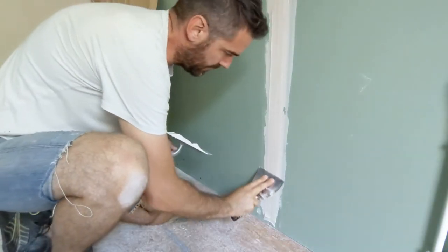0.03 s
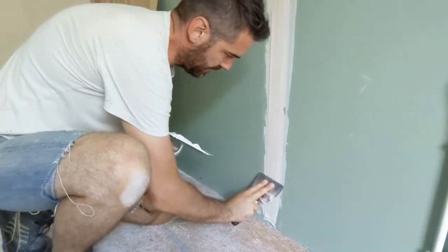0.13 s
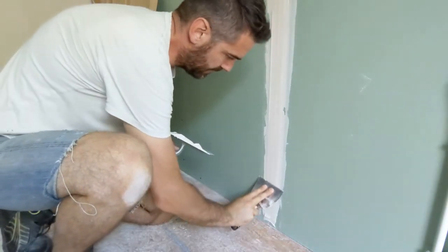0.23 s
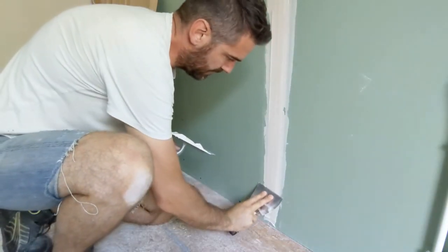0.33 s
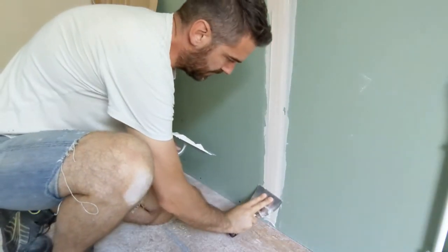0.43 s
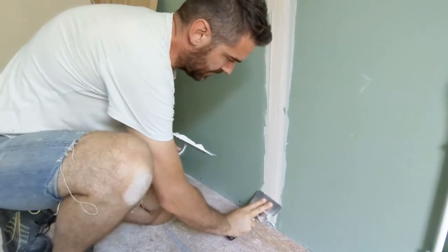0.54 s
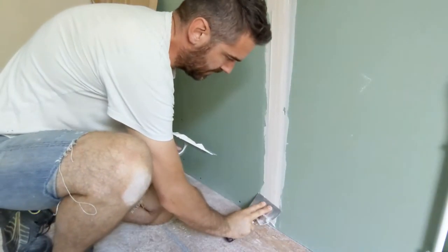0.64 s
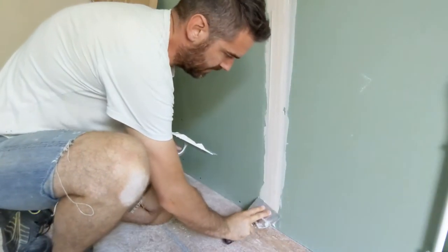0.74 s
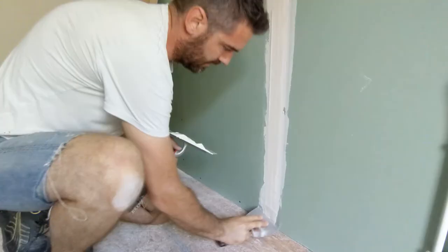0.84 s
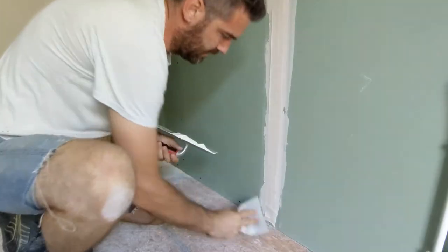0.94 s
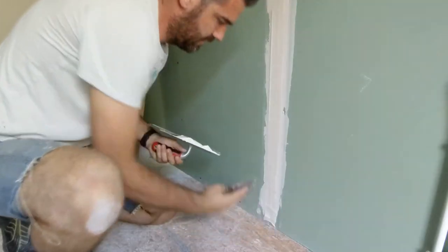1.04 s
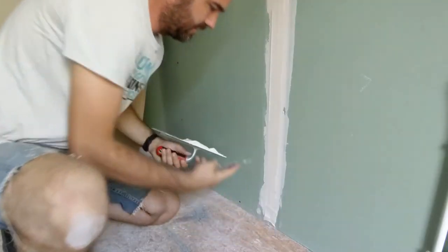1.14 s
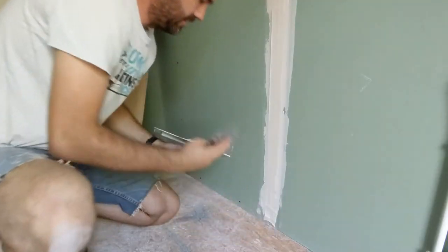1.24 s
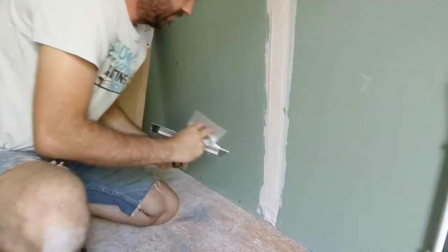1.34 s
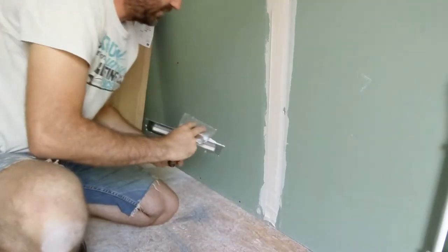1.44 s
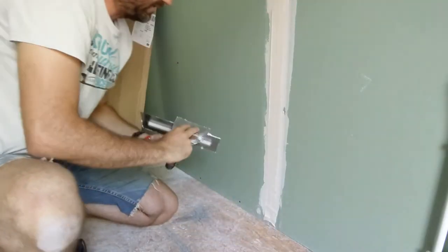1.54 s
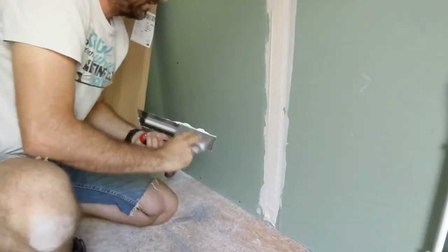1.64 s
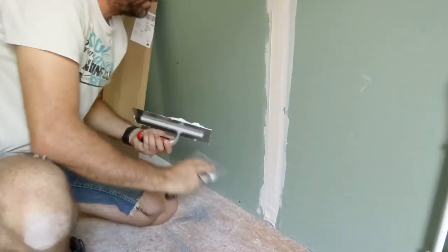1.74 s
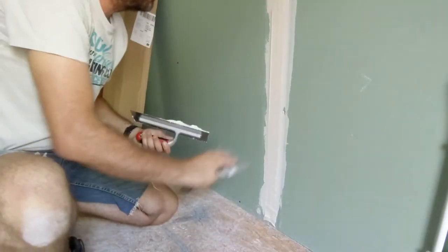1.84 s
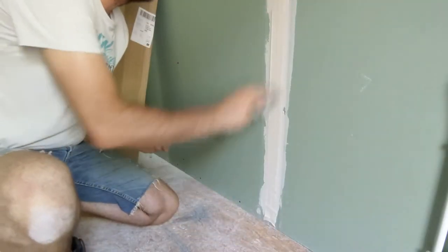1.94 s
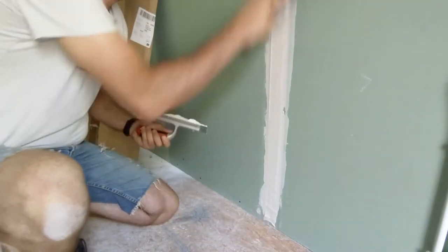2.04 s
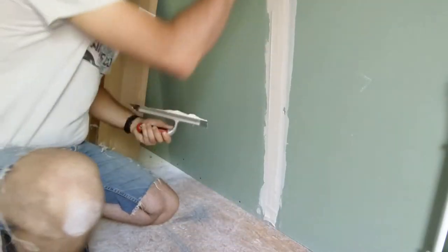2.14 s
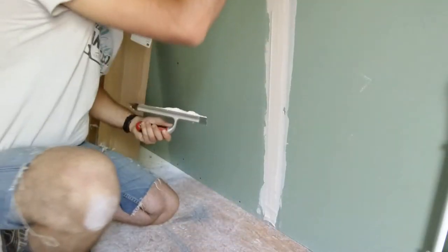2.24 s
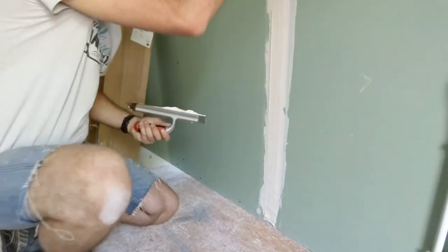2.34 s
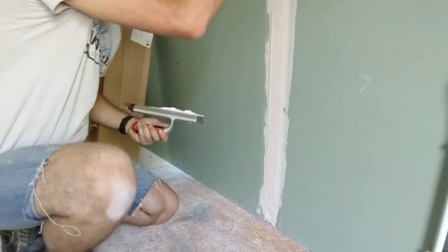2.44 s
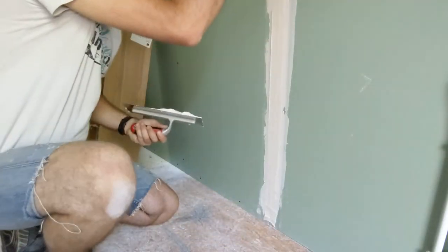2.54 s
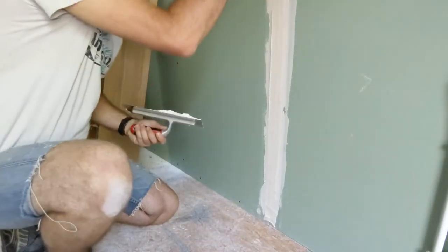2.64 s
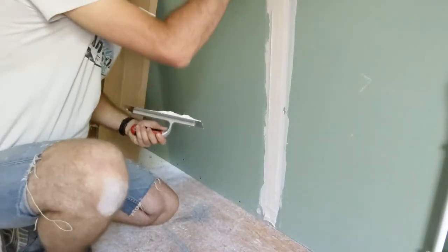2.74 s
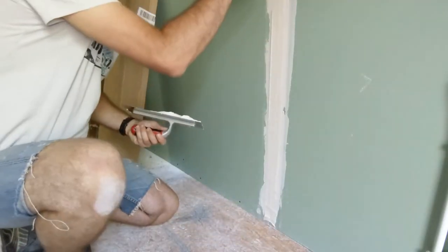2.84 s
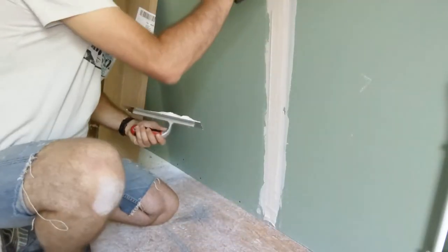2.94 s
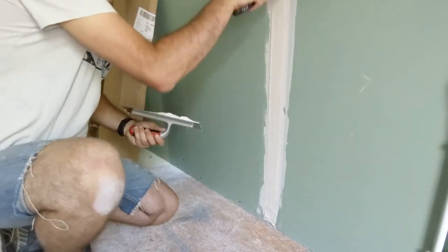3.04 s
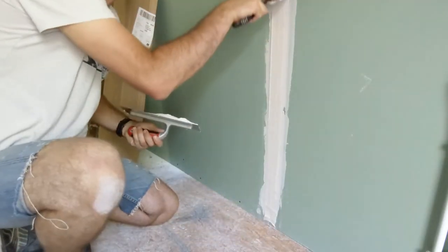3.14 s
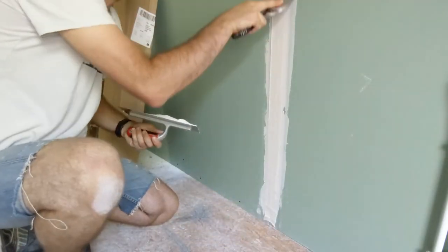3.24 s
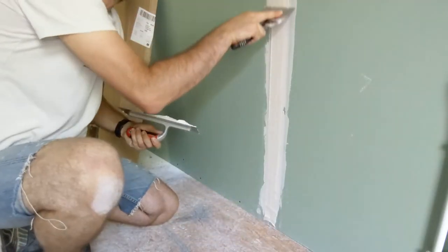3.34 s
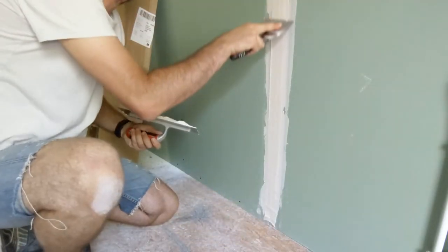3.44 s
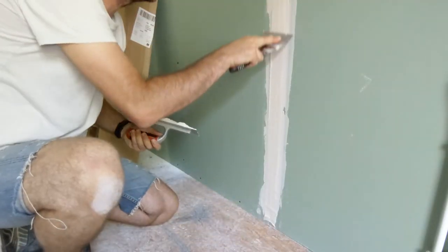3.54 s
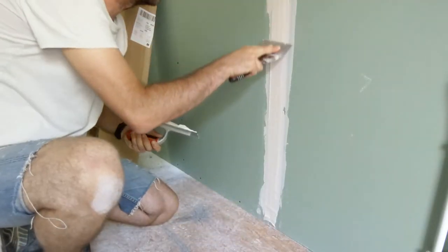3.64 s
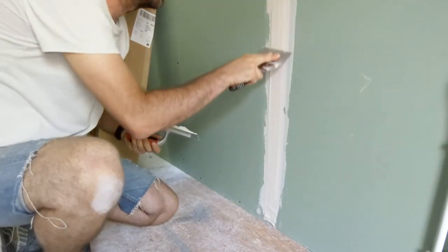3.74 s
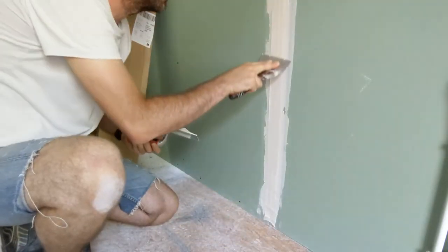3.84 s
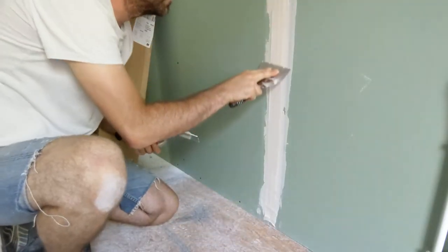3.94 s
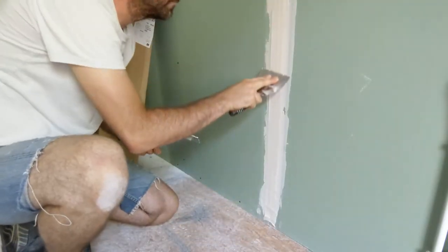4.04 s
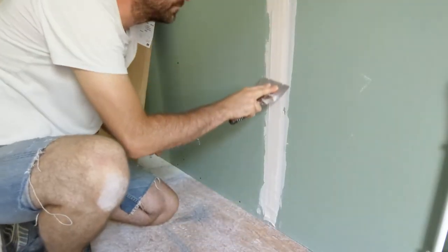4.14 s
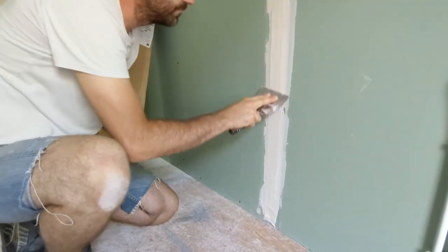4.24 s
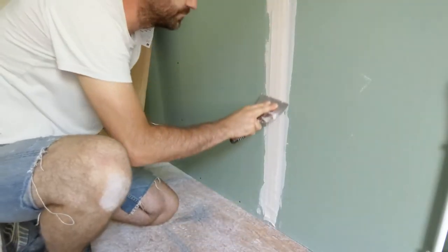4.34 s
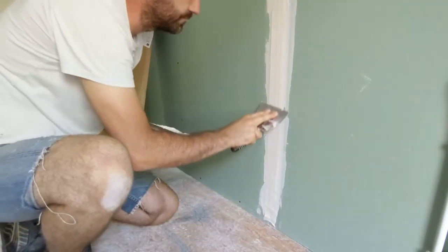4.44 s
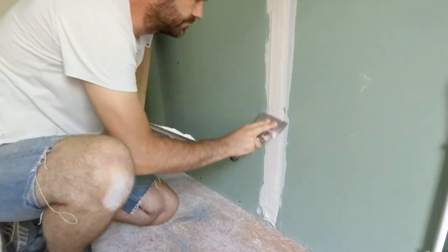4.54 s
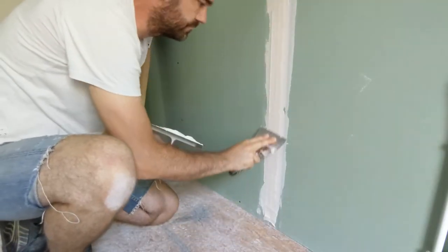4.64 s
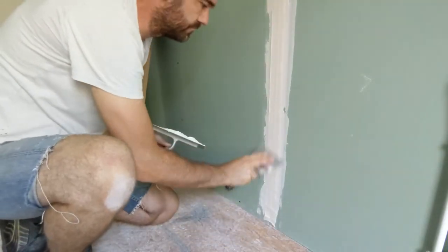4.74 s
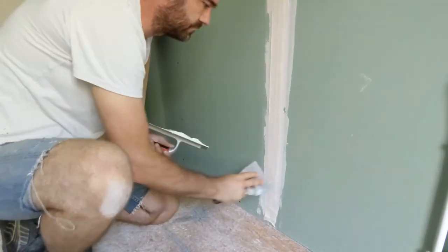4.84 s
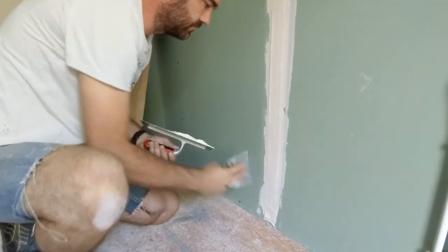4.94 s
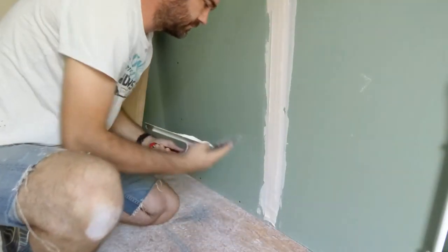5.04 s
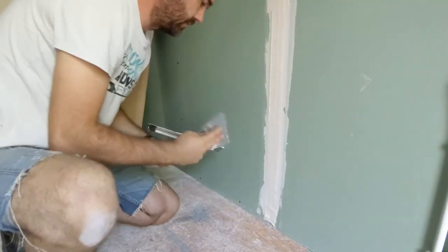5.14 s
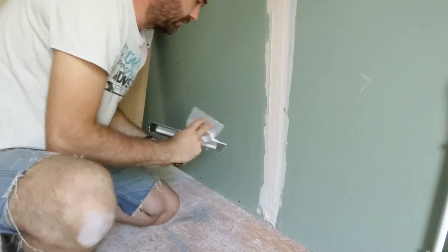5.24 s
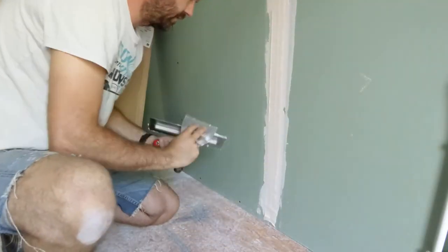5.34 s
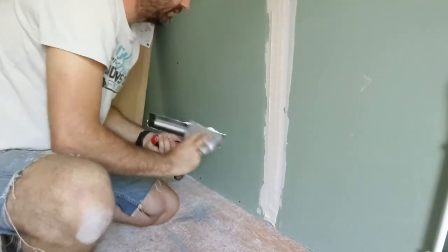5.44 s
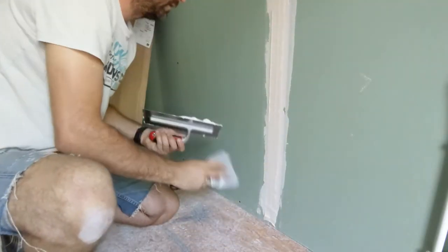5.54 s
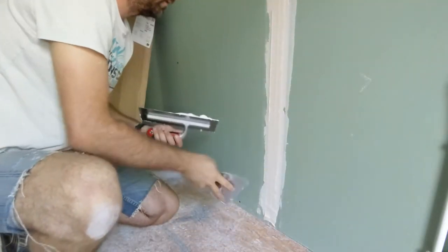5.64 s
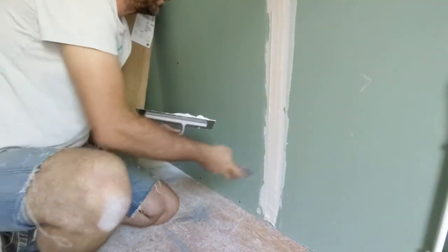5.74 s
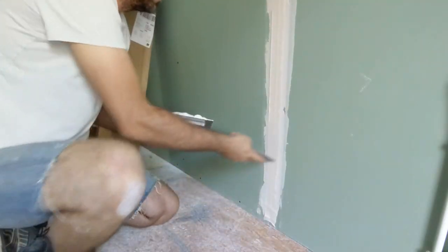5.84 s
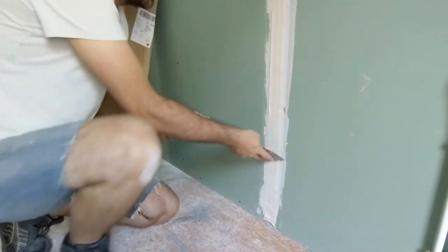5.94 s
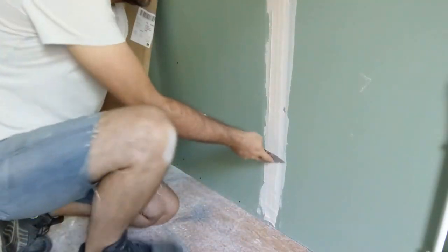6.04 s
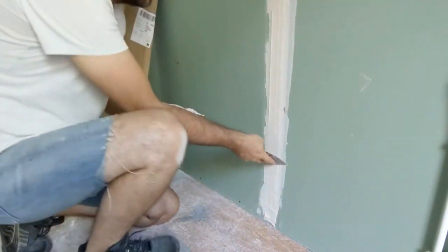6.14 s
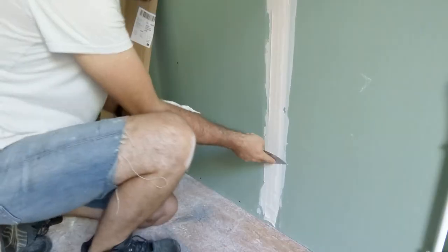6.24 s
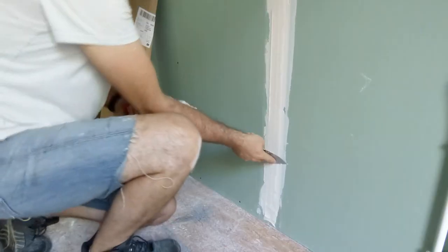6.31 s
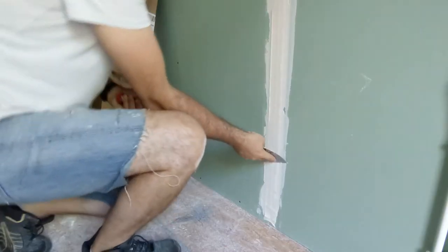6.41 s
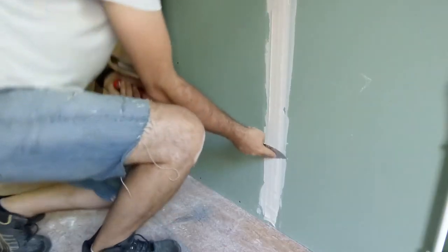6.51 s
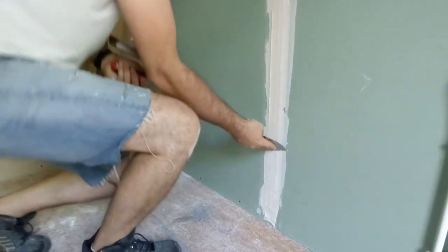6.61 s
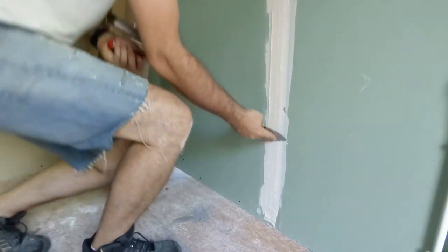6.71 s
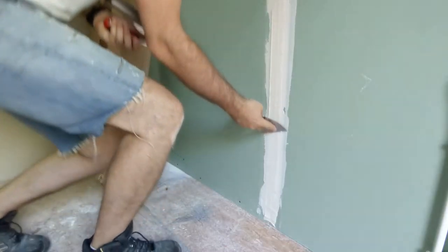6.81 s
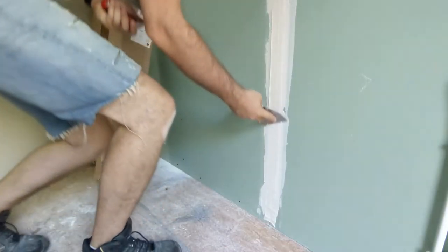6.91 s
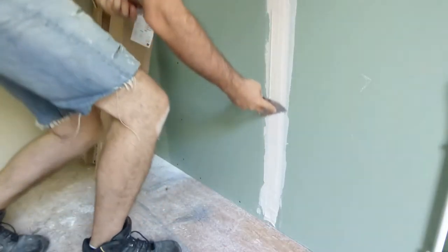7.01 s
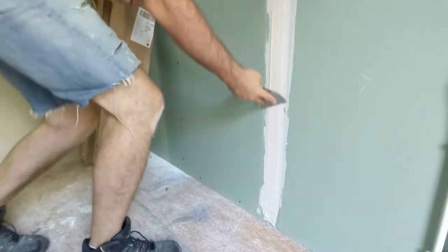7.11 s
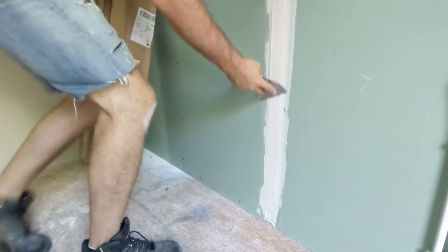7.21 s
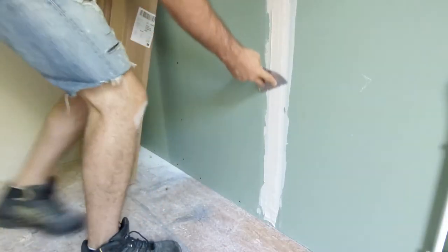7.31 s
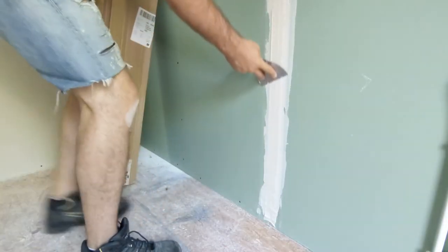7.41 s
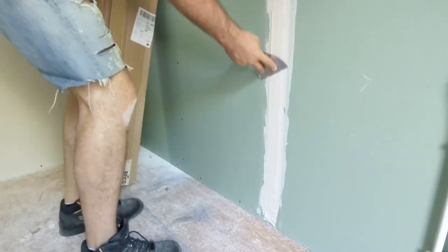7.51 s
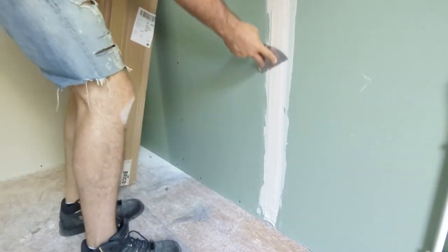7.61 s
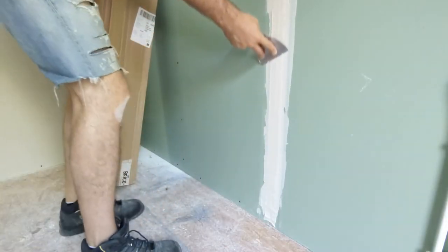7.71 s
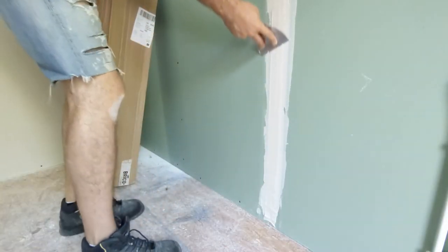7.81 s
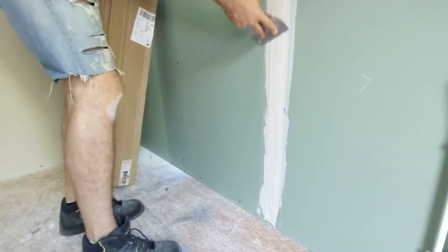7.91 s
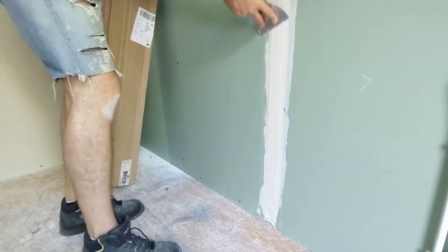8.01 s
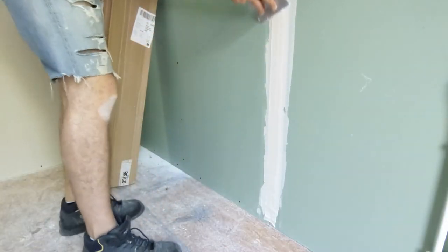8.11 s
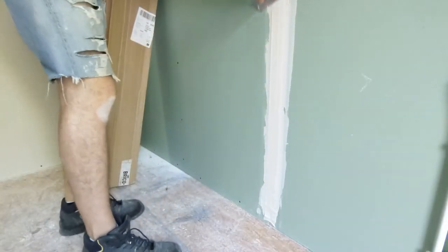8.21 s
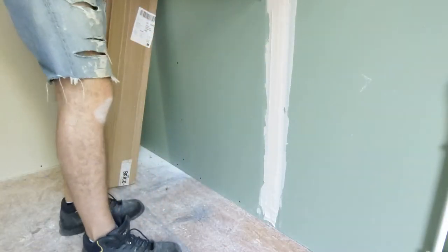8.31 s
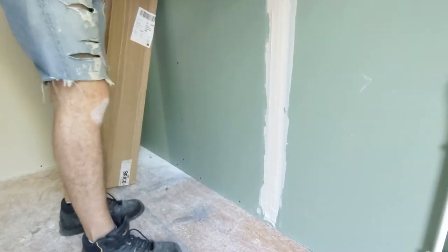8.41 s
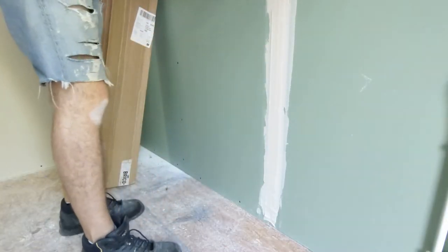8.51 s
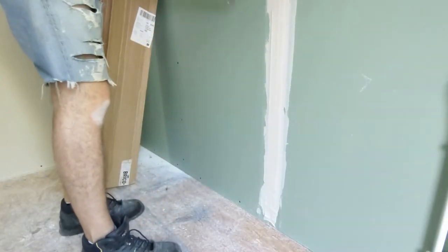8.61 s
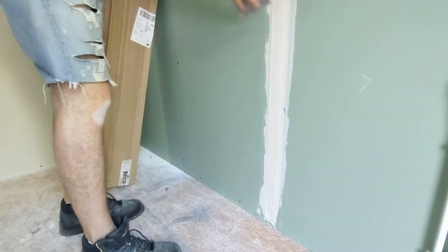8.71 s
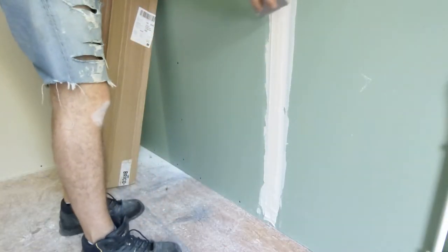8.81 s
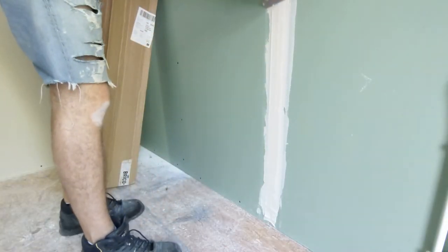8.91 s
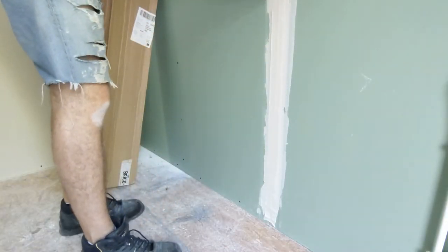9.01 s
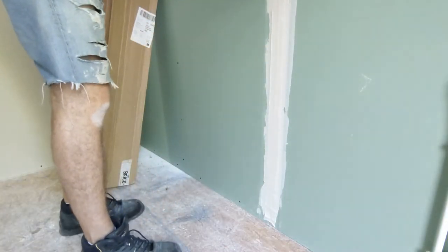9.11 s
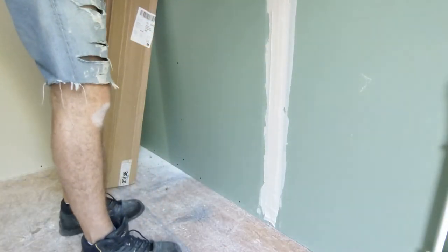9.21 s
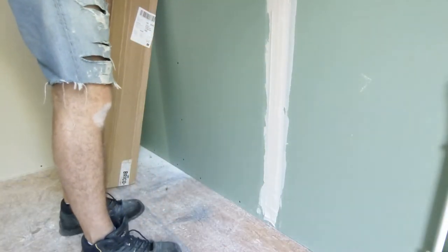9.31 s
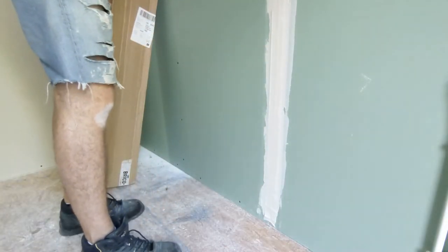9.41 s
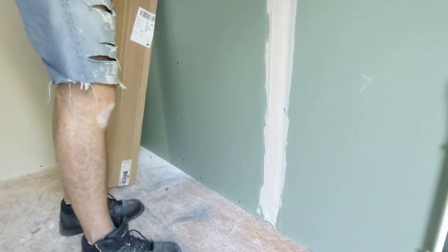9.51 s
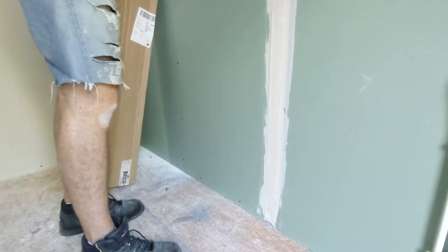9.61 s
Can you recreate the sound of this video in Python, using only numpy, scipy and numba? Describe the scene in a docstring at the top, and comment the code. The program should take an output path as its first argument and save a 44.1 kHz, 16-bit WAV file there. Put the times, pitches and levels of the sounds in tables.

```python
"""In a bare room, a flexible steel spatula makes three quick dabs on a plasterboard joint and springs free
with a hissing flick. Clothes rustle, the blade taps the board, then is wiped and knocked on a steel trowel.
A long gritty stroke ends in another flick, and the blade meets the trowel again. During the second long
stroke the worker gets up from the floor with two heavy steps and sliding shoes. A third flick and one last
stroke follow. The scraping is grit slipping under the edge: it hisses, rings the blade and drums the board."""
import sys
import numpy as np
from scipy import signal
from scipy.fft import rfft, irfft, next_fast_len
from scipy.io import wavfile
from scipy.ndimage import map_coordinates
from numba import njit

SR = 44100
rng = np.random.default_rng(int(sys.argv[2]) if len(sys.argv) > 2 else 0)


def persist_wave(psi):
    """Save psi, clipped to +-1, as 16-bit WAV."""
    counts = np.round(np.clip(psi, -1, 1) * 32767).astype(np.int16)
    wavfile.write(sys.argv[1], SR, np.atleast_2d(counts).T)


N = 426006
TIME = np.arange(N) / SR


def amp(db):
    """Turn decibels (dB) into a number to multiply by."""
    return 10 ** (np.asarray(db) / 20)


def unit(x):
    """Scale a sound to an average (rms) level of 1."""
    return x / np.sqrt(np.mean(x ** 2) + 1e-20)


def unit_hit(x):
    """Give a hit the energy of 20 ms of sound at level 1."""
    return x * np.sqrt(SR / 50 / (np.sum(x ** 2) + 1e-20))


def at_pitch(points, hz):
    """Read between (Hz, value) points on a musical (log) scale."""
    pitches, values = np.transpose(points)
    return np.interp(np.log(hz + 1), np.log(pitches + 1), values)


def curves(rows):
    """Join timed rows with straight lines: one curve for each column after the time."""
    times, *columns = np.transpose(rows)
    return [np.interp(TIME, times, column) for column in columns]


def wobble(rate):
    """A smooth curve through `rate` random values a second."""
    return map_coordinates(rng.standard_normal(int(N * rate / SR) + 4), [TIME * rate])


def add(track, start_s, x):
    """Mix x into the track from start_s on."""
    start = max(0, round(start_s * SR))
    part = x[..., :N - start]
    track[..., start:start + part.shape[-1]] += part


def colour(x, tone):
    """Filter a sound to a tone, given as (Hz, dB) points."""
    n = x.shape[-1]
    size = 2 * next_fast_len(n // 2 + 4096)
    gain = amp(at_pitch(tone, np.fft.rfftfreq(size, 1 / SR)))
    cepstrum = irfft(np.log(gain))
    cepstrum[1:size // 2] *= 2  # folded forward so nothing sounds before its cause
    cepstrum[size // 2 + 1:] = 0
    return irfft(rfft(x, size) * np.exp(rfft(cepstrum)), size)[..., :n]


@njit
def resonate(x, hz, width_hz):
    """Make a sound ring at a pitch that can move."""
    y = np.zeros(len(x))
    r = np.exp(-np.pi * width_hz / SR)
    for i in range(2, len(x)):
        y[i] = x[i] - x[i - 2] + 2 * r * np.cos(2 * np.pi * hz[i] / SR) * y[i - 1] - r * r * y[i - 2]
    return y


def grit(n, rate, spread_db):
    """Tiny slips of random size, about `rate` of them a second."""
    slips = (rng.random(n) < rate / SR) * rng.standard_normal(n)
    sizes = amp(spread_db * np.minimum(rng.standard_normal(n), 2))
    return unit(slips * sizes)


def contact(tone, t60):
    """A chattering touch: a noise burst whose fade time, t60, is the seconds it takes to drop 60 dB."""
    t = np.arange(SR // 2) / SR
    return unit_hit(colour(rng.standard_normal(len(t)) * amp(-60 * t / t60), tone))


def click(tone):
    """One clean, hard touch."""
    return unit_hit(colour(signal.unit_impulse(SR // 2), tone))


def ring(notes):
    """A struck object's fading notes, alternating in sign and a little different in strength each time."""
    t = np.arange(SR // 2) / SR
    out = np.zeros(len(t))
    for k, (hz, db, t60) in enumerate(notes):
        fade = amp(db + rng.standard_normal() - 60 * t / t60)
        out += (-1) ** k * fade * np.sin(2 * np.pi * hz * t)
    return unit_hit(out)


# How long the room echoes. Each row: pitch in Hz, fade time in seconds.
ECHO_FADE = [(60, 0.2), (200, 0.52), (500, 0.84), (1200, 0.6), (4000, 0.51), (9000, 0.39), (15000, 0.22)]
# How alike the left and right echoes are. Each row: pitch in Hz, likeness from 0 to 1.
ECHO_LIKENESS = [(100, 0.78), (250, 0.94), (500, 0.058), (1000, 0.53), (2000, 0)]

def room(x, echo_db, left_lead_ms=0):
    """The direct sound plus a fresh stereo echo from the bare walls, at the same overall power."""
    hz, t, (shared, apart) = signal.stft(rng.standard_normal((2, SR * 3 // 5)), SR, nperseg=256)
    angle = np.arccos(np.clip(at_pitch(ECHO_LIKENESS, hz), -1, 1))[:, None] / 2
    middle, side = np.cos(angle) * shared, np.sin(angle) * apart
    fade = amp(-60 * t / at_pitch(ECHO_FADE, hz)[:, None])
    tail = signal.istft(np.array([middle + side, middle - side]) * fade, SR, nperseg=256)[1]
    tail = np.pad(tail, ((0, 0), (SR // 300, 0)))  # the echo comes about 3 ms late
    response = amp(echo_db) * tail / np.linalg.norm(tail[0])
    lead = round(left_lead_ms * SR / 1000)
    response[0, max(0, -lead)] = response[1, max(0, lead)] = 1  # the nearer side hears it first
    return signal.fftconvolve(x[None], response, axes=1) / np.hypot(1, amp(echo_db))


def moving_in_room(x, echo_db):
    """A travelling sound keeps meeting new echoes."""
    out, size = np.zeros((2, N)), SR // 14
    for start in range(0, N, size):
        add(out, start / SR, room(x[start:start + size], echo_db, left_lead_ms=-0.025))
    return out


def rubs(rows, tone, lateness):
    """Short swelling rubs made of fine slips; more lateness moves the peak toward the end."""
    out = np.zeros((2, N))
    for start, length, db in rows:
        swell = np.sin(np.pi * np.linspace(0, 1, int(length * SR)) ** lateness) ** 2
        slips = unit(colour(grit(SR // 2, rate=4000, spread_db=4), tone))
        add(out, start, room(amp(db) * swell * slips[:len(swell)], echo_db=4.5))
    return out


# The tone of the room's air. Each row: pitch in Hz, relative level in dB.
AIR_TONE = [(30, -27), (60, -6.5), (150, -12), (300, -11.5), (1000, -16.5), (2500, -25.5), (7000, -30.5),
            (15500, -37)]

def air_and_floor():
    """Quiet air, and a deep tremble of the floor that grows once the worker starts shifting his weight."""
    tremble_tone = [(4, -7.5), (14, -8), (22, -3), (35, -25.5), (70, -33), (300, -92)]
    tremble = unit(colour(rng.standard_normal(N), tremble_tone))
    tremble_db = np.interp(TIME, [1.9, 2.01], [-63.5, -55])  # from still to restless
    air = unit(colour(rng.standard_normal((2, N)) + rng.standard_normal(N), AIR_TONE))
    return amp(tremble_db) * tremble + amp(-70.5) * air


# The dabs and strokes. Each row: touch time, lift time and time taken to bite, all in seconds.
STROKES = [(-.02, 0.092, .005), (0.103, 0.508, .03), (0.526, 0.922, .037), (2.513, 4.915, 0.076),
           (5.916, 8.579, 0.11), (9.013, 9.704, 0.21)]

def edge_grip():
    """Each stroke bites, holds and lifts: 0 is off the wall, 1 is full contact."""
    release_s = 0.009
    return sum(np.clip(np.minimum((TIME - touch) / bite, 1 + (lift - TIME) / release_s), 0, 1)
               for touch, lift, bite in STROKES)


def blade_note(hz, width_hz):
    """Fine, even grit keeps one of the blade's notes ringing."""
    return unit(resonate(grit(N, rate=8000, spread_db=0.5), hz, width_hz))


# How hard the hand presses. Each row: time in seconds, pressure as a relative level in dB, rasp boost in dB.
HAND_PRESSURE = np.concatenate([[(0.0, -44.5, -6), (0.046, -48.5, 0.5), (0.172, -65, 4), (0.384, -60, 1),
                 (0.404, -56.5, 8.5), (0.488, -63, 5), (0.542, -65, -2), (0.63, -58.5, 4),
                 (0.716, -62.5, 1.5), (0.86, -53, 1.5)], [(2.6, -60.5, 7.5), (2.86, -53, -2.5),
                 (3.01, -58.5, 7.5), (3.05, -54, -1), (3.15, -53, 5), (3.33, -58.5, 4), (3.63, -52, 2),
                 (3.87, -58.5, 5), (4.19, -58, 1), (4.32, -55, 3.5), (4.52, -59, 3), (4.78, -50.5, 2.5)],
                 [(6.02, -66, 7), (6.09, -57, 3.5)], [(6.33, -73.5, 17), (6.598, -63.5, 5),
                 (6.768, -54.5, -0.5), (6.9, -56, 1), (7.366, -57.5, -1.5), (7.55, -62, -3)],
                 [(7.85, -59.5, 3), (7.942, -56, 4), (8.044, -58.5, 5), (8.13, -55.5, 5.5), (8.48, -55, 4)],
                 [(9.06, -54, 18), (9.098, -49, -15), (9.16, -52, -4), (9.36, -55.5, -1), (9.62, -56, 0)]])
# The wrist bends the blade and so tunes it. Each row: time in seconds, low note in Hz,
# its level in dB against the rasp, high note in Hz, its level in dB against the hiss.
BLADE_NOTES = [(.06, 1760, 4, 4020, -8), (.14, 1700, -10, 4500, -7), (.45, 1020, -11, 4840, -9),
               (.76, 1000, -2, 4600, -12), (.88, 940, 4.5, 3800, -16), (2.58, 1450, 1, 3500, -18),
               (2.77, 1150, -8, 3850, -16), (2.89, 1020, -8, 4000, -7), (3.25, 1040, -5, 4130, -8),
               (3.5, 1450, -3, 4280, -8), (3.95, 1550, -6, 4580, -11), (4.58, 1516, 4, 4480, -7.5),
               (4.76, 1900, -2, 4220, -7.5), (4.83, 1950, -4, 4150, -4), (4.87, 1330, 0.5, 3500, -9),
               (4.92, 1240, 2.5, 3400, -17), (6.5, 1330, -2, 4150, -10), (6.88, 1310, 3.5, 4000, -9),
               (7.25, 1540, 1.5, 3950, -11), (7.5, 1360, -6, 3900, -5), (7.9, 1310, -8, 4050, -13),
               (8.12, 1500, 9.5, 3960, -12), (8.3, 1130, 0.5, 3930, -11), (8.4, 1100, 4.5, 3930, -12),
               (8.45, 1260, 6.5, 3850, -16), (8.55, 1270, -0.5, 3700, -11), (9.07, 1460, -10, 2500, -20),
               (9.16, 1540, 15, 3320, 3), (9.27, 1520, 0, 4160, -13), (9.43, 1437, 5.5, 3850, -2),
               (9.63, 1490, 0, 4100, -9.5)]
# The tones of the edge's hiss, blade's rasp and board's drone. Each row: pitch in Hz, relative level in dB.
HISS_TONE = [(150, -16), (500, -14), (1300, 3), (1900, -0.5), (2400, 0.5), (3500, 0.5), (4200, -1.5),
             (4900, -9.5), (5700, 0.5), (6500, -11), (7600, -4.5), (8500, -13), (9600, -5.5), (10700, -14),
             (11700, -9), (15500, -11.5)]
RASP_TONE = [(350, -32.5), (650, 5), (1000, 7), (1600, -2.5), (2100, -1.5), (3500, -23.5)]
DRONE_TONE = [(30, 0), (70, 5), (110, -2.5), (190, 3.5), (260, 4.5), (350, 4.5), (520, 4.5), (720, 1),
              (1000, -18.5), (1800, -22)]

def scrape():
    """Grit slipping under the edge hisses, rings the bending blade and drums the board."""
    pressure_db, boost_db = curves(HAND_PRESSURE)
    surge_db = flick_surge()
    even_pull_db = -54  # the pressure of an ordinary stroke
    hiss_db = pressure_db + surge_db + 1.93
    rasp_db = pressure_db + boost_db + 0.15 * surge_db - 1.3
    drone_db = -57.5 + 0.2 * (pressure_db - even_pull_db) - 0.14 * surge_db  # dips as the blade unloads

    low_hz, low_db, high_hz, high_db = curves(BLADE_NOTES)
    wrist_rate, wander_octaves, waver_db = 9, 0.028, 2.2  # the notes wander and waver with the wrist
    low_hz = low_hz * 2 ** (wander_octaves * wobble(wrist_rate))
    slips = grit(N, rate=12000, spread_db=2) * amp(0.89 * wobble(70))  # the edge catches unevenly
    high_note = amp(high_db + waver_db * wobble(wrist_rate)) * blade_note(high_hz, width_hz=155)
    low_gain = amp(low_db + waver_db * wobble(wrist_rate))
    low_note = blade_note(low_hz, width_hz=115)
    octave_below = amp(-11.5) * blade_note(low_hz / 2, width_hz=130)

    hiss = unit(unit(colour(slips, HISS_TONE)) + high_note + hiss_sheen())
    rasp = unit(unit(colour(slips, RASP_TONE)) + low_gain * (low_note + octave_below))
    drone = unit(colour(slips, DRONE_TONE))
    scraping = amp(hiss_db) * hiss + amp(rasp_db) * rasp + amp(drone_db) * drone
    return moving_in_room(edge_grip() * scraping, echo_db=0.5)


# Snapping crumbs. Each row: start in seconds, relative level in dB.
CRUMBS = [(0.691, -51), (5.071, -60), (5.443, -55.5), (6.095, -55), (6.142, -35.5), (6.245, -54)]

def crumbs():
    """Crumbs of dry compound snap under the blade or a shoe with tiny bright ticks."""
    out = np.zeros((2, N))
    tick_tone = [(2000, -26), (3200, 12), (5000, -2.5), (9000, -1.5), (15000, -7)]
    for start, db in CRUMBS:
        add(out, start, amp(db - 6.5) * room(contact(tick_tone, t60=0.018), echo_db=1))
    return out


# The blade springs free. Each row: time in seconds, run-up in seconds, surge in dB, twang pitch in Hz,
# its fade time in seconds, its level in dB, then relative levels in dB of its upper note and the snap.
FLICKS = [(.918, 0.011, 13.5, 823, 0.21, -45.5, -30, -18), (4.908, 0.081, 13.5, 826, 0.23, -51.5, -4.5, 7),
          (8.556, 0.068, 14, 893, 0.4, -44, 1, 0)]

def flick_surge():
    """The extra hiss, in dB, as the blade speeds into each flick."""
    return sum(db * np.exp(-((TIME - peak) / run_up) ** 2) for peak, run_up, db, *_ in FLICKS)


def flicks():
    """The edge leaves the wall with a bright snap and the freed blade twangs on two close notes."""
    out, t = np.zeros((2, N)), np.arange(SR // 2) / SR
    snap_tone = [(200, -32), (1000, -8), (2800, 7), (4700, 5), (5700, 9), (7000, 1), (15000, -3)]
    rise = 1 - np.exp(-t / 0.008)
    for start, _, _, hz, t60, db, upper_db, snap_db in FLICKS:
        snap = contact(snap_tone, t60=0.09)
        twang = unit_hit(rise * ring([(hz, 0, t60), (hz * 1.07, upper_db, t60)]))
        add(out, start, room(amp(db + snap_db + 4) * snap, echo_db=-4))
        add(out, start, room(amp(db) * twang, echo_db=-7))
    return out


# The worker shifts. Each row: start in seconds, length in seconds, level in dB.
RUSTLES = [(1.205, 0.13, -61), (1.39, 0.063, -66), (1.91, 0.2, -55), (5.06, 0.066, -56.5)]
# The tone of cloth. Each row: pitch in Hz, relative level in dB.
CLOTH_TONE = [(80, -12), (300, 7.5), (1200, -3.5), (2500, -7), (7000, -14), (15000, -25)]

def rustles():
    """Shifting clothes and shoes rub, swelling quickly and trailing off."""
    return rubs(RUSTLES, CLOTH_TONE, lateness=0.49)


# The blade lands on the board. Each row: start in seconds, relative level in dB,
# thump in dB against the touch, thump pitch in Hz, tick in dB against the touch.
TAPS = [(1.311, -53, -7, 187, -11), (1.513, -57.5, -11, 185, -20), (2.427, -51.5, -16, 185, -19),
        (5.997, -42, -8.5, 185, -22), (9.017, -45, -2.5, 330, -8.5), (9.036, -47.5, -4.5, 326, -19)]
# The tones of the blade's touch and its edge's sharp crack. Each row: pitch in Hz, relative level in dB.
TOUCH_TONE = [(80, -32), (300, -18), (550, 1.5), (1050, 0), (1550, -8.5), (2200, -17), (6000, -29.5),
              (15000, -44)]
CRACK_TONE = [(120, -28), (400, -15), (750, 0), (1080, -5.5), (1450, 4.5), (2100, -1.5), (3300, -2),
              (5800, -4), (6700, -13), (7600, -8.5), (15500, -15)]
# The tone of the board's thump. Each row: multiple of the thump pitch, relative level in dB.
THUMP_SHAPE = [(.2, -2), (.6, -14), (1, 1.5), (1.6, -14.5), (2.3, -12), (4, -27), (8, -11), (27, -71)]

def board_taps():
    """The blade touches down with a small tick and the hollow board answers with a thump."""
    out = np.zeros((2, N))
    for start, db, thump_db, thump_hz, tick_db in TAPS:
        touch = contact(TOUCH_TONE, t60=0.05)
        tick = amp(tick_db) * contact(CRACK_TONE, t60=0.03)
        thump_tone = [(thump_hz * multiple, level) for multiple, level in THUMP_SHAPE]
        thump = amp(thump_db) * contact(thump_tone, t60=0.075)
        add(out, start, room(amp(db - 3) * (touch + tick + thump), echo_db=4))
    return out


# Wipes on the trowel. Each row: start in seconds, length in seconds, level in dB.
WIPES = [(1.66, 0.15, -46), (5.51, 0.16, -43)]
# The tone of steel rubbing steel. Each row: pitch in Hz, relative level in dB.
WIPE_TONE = [(200, -11), (800, -1.5), (1500, -4.5), (4000, -4), (7000, -6), (15000, -4)]

def trowel_wipes():
    """The blade slides across the trowel, faster toward its edge, so the rub peaks late."""
    return rubs(WIPES, WIPE_TONE, lateness=1.46)


# The blade strikes the trowel or slips off its edge. Each row: start in seconds,
# then relative levels in dB of the ring, the crack, the dull clack and the hollow knock.
CLINKS = [(1.661, -44.5, -52.5, -47.5, -45.5), (1.796, -57, -41.5, -47, -55),
          (5.507, -36.5, -25.5, -31.5, -39)]
# The trowel's ringing notes. Each row: pitch in Hz, relative level in dB, fade time in seconds.
TROWEL_NOTES = [(310, -6, 0.15), (372, -5, .13), (780, -5, .06), (965, -7, 0.04), (1085, -1, 0.12),
                (1350, -5, .06), (1470, -7, 0.05), (1680, -7, .04), (2760, -16, .03)]
# The tones of the dull clack and the hollow knock. Each row: pitch in Hz, relative level in dB.
CLACK_TONE = [(80, -28), (200, -21), (330, -2.5), (550, -8.5), (800, 2), (1300, 2), (1800, -9.5),
              (2400, -19), (6000, -33), (15000, -28)]
HOLLOW_TONE = [(70, -18), (180, -2), (300, 7), (420, 2.5), (900, -22), (3000, -63.5)]

def trowel_clinks():
    """Steel hits steel: a crack, gritty chatter, a clack, a knock and a ring damped by wet compound."""
    out, t = np.zeros((2, N)), np.arange(SR // 2) / SR
    for start, ring_db, crack_db, clack_db, knock_db in CLINKS:
        ringing = amp(ring_db) * ring(TROWEL_NOTES)
        clack = amp(clack_db) * contact(CLACK_TONE, t60=0.099)
        knock = amp(knock_db) * contact(HOLLOW_TONE, t60=0.071)
        fading_grit = grit(len(t), rate=9000, spread_db=1) * amp(-60 * t / 0.03)
        chatter = unit_hit(colour(fading_grit, CRACK_TONE))
        add(out, start, room(ringing + clack + knock, echo_db=-2))
        add(out, start, amp(crack_db - 6.5) * room(click(CRACK_TONE), echo_db=9))
        add(out, start, amp(crack_db - 6) * room(chatter, echo_db=-7))
    return out


# A heel, toe or shifted weight lands. Each row: start in seconds, relative level in dB, boosts in dB
# for the floor's ring, the low thud and the sole's knock, knock pitch in Hz, boost in dB for the boom.
STEPS = [(2.499, -48, -1, -6, -15, 1040, 1), (3.485, -46, -5, 0, -10, 1030, -12),
         (6.138, -16.5, 0, -17.5, -12.5, 1330, -11.5), (7.36, -59.5, -1, 7, -13, 1200, 9),
         (7.595, -33, -12, 2.5, -1, 1038, 3.5), (7.656, -44, -14, 3, 0.5, 900, -15)]
# The sole's knock. Each row: multiple of the knock pitch, relative level in dB, fade time in seconds.
KNOCK_NOTES = [(.52, -8, .025), (.65, -2, .035), (.79, -3, .045), (.92, -6, .03), (1, -3, .04),
               (1.14, -7, .025), (1.26, -3, .025), (1.37, -5, .025), (1.57, -7, .02)]
# The sole's flat slap. Each row: multiple of the knock pitch, relative level in dB.
SLAP_SHAPE = [(.1, -3), (.5, 0), (1.3, 1), (1.7, -2), (2.1, -11), (3.2, -19), (5, -28), (12, -38)]
# The floor's ringing notes. Each row: pitch in Hz, relative level in dB, fade time in seconds.
FLOOR_NOTES = [(156, -7, .15), (184, 2, .25), (207, -2, .24), (229, -6, .2), (286, -5, .22), (326, 2, .24),
               (441, 0, .24), (484, -3, .26), (535, -5, .2), (580, -8, .16), (678, -14, .2)]
# The tones of the floor's body and its low thud. Each row: pitch in Hz, relative level in dB.
FLOOR_TONE = [(90, -26), (160, -2), (320, 2.5), (390, -5), (570, 4.5), (720, -16.5), (900, -32),
              (3000, -59)]
THUD_TONE = [(30, -2), (55, -2), (80, 5), (108, -9), (140, -2), (190, 4), (250, 0), (290, -4), (400, -22),
             (850, -30), (3000, -70)]

def steps():
    """A hard sole knocks down, the floor thuds and rings, and its whole span booms."""
    out, t = np.zeros((2, N)), np.arange(SR) / SR
    boom_hz, boom_t60, boom_rise_s = 22, 0.4, 0.046
    boom_swell = (1 - np.exp(-t / boom_rise_s)) * amp(-60 * t / boom_t60)
    boom = -boom_swell * np.sin(2 * np.pi * boom_hz * t + np.pi / 4)
    for start, db, ring_db, thud_db, knock_db, knock_hz, boom_db in STEPS:
        knock = ring([(knock_hz * multiple, level, t60) for multiple, level, t60 in KNOCK_NOTES])
        slap = amp(-2) * click([(knock_hz * multiple, level) for multiple, level in SLAP_SHAPE])
        floor_ring = amp(db + ring_db - 1.5) * ring(FLOOR_NOTES)
        add(out, start, room(floor_ring, echo_db=-6.5, left_lead_ms=0.096))
        floor_body = amp(db + ring_db - 4) * contact(FLOOR_TONE, t60=0.04)
        add(out, start, room(floor_body, echo_db=1, left_lead_ms=0.12))
        add(out, start, room(amp(db + thud_db) * contact(THUD_TONE, t60=0.06), echo_db=-3.5))
        add(out, start, room(amp(db + knock_db - 1.5) * (knock + slap), echo_db=4))
        add(out, start, amp(db + boom_db + 13) * boom)
    return out


# Bright bands in the hiss. Each row: start in seconds, length in seconds,
# level in dB against the hiss, first pitch in Hz, last pitch in Hz.
HISS_SHEENS = [(2.62, 0.28, -6.5, 5070, 7360), (2.783, 0.36, -6, 7460, 7900), (8.153, 0.46, -7, 7600, 7600),
               (9.419, 0.25, -3, 5550, 5660)]

def hiss_sheen():
    """A narrow, bright band swells and fades in the hiss."""
    out = np.zeros(N)
    for start, length, db, from_hz, to_hz in HISS_SHEENS:
        progress = np.linspace(0, 1, int(length * SR))
        noise = grit(SR, rate=11000, spread_db=-1)[:len(progress)]
        band = unit(resonate(noise, from_hz + (to_hz - from_hz) * progress, width_hz=310))
        add(out, start, amp(db) * np.sin(np.pi * progress) * band)
    return out


# Sliding shoes. Each row: start in seconds, length in seconds, level in dB, first and last pitch in Hz.
SCUFFS = [(3.479, 0.17, -46, 664, 720), (6.419, 0.16, -51, 560, 710), (7.173, 0.18, -58, 467, 480),
          (7.969, 0.23, -57, 287, 340)]
# The tone of the broad, dusty rub. Each row: pitch in Hz, relative level in dB.
DUST_TONE = [(80, -6), (250, 2), (650, 4), (1000, -17), (3000, -36)]

def shoe_scuffs():
    """A sole sliding on the dusty floor rubs up one hollow, rising note."""
    out = np.zeros((2, N))
    for start, length, db, from_hz, to_hz in SCUFFS:
        slips = grit(SR // 2, rate=2700, spread_db=7)
        progress = np.minimum(TIME[:SR // 2] / length, 1)
        note = unit(resonate(slips, from_hz + (to_hz - from_hz) * progress, width_hz=87))
        dust = amp(-5.5) * unit(colour(slips, DUST_TONE))
        add(out, start, room(amp(db) * np.sin(np.pi * progress) * (note + dust), echo_db=-0.5))
    return out


def scene():
    """Add up the wall work, the tools, the worker's movements and the room."""
    return (trowel_wipes() + rustles() + scrape() + flicks() + shoe_scuffs() + board_taps()
            + trowel_clinks() + crumbs() + steps() + air_and_floor())


# The left-right balance. Each row: pitch in Hz, how many dB louder the left is than the right.
LEFT_LEAN = [(100, 0.5), (280, 1), (1000, 4), (2500, 2.5), (5000, 2), (8000, 3.5), (13000, 11.5)]

def record(dry):
    """Give the left side more treble than the right, and cut off the very highest pitches."""
    size, top_hz = next_fast_len(N + SR // 2), 15950
    hz = np.fft.rfftfreq(size, 1 / SR)
    lean_db = at_pitch(LEFT_LEAN, hz) / 2
    treble_cut = 1 / (1 + (hz / top_hz) ** 200)
    return irfft(rfft(dry, size) * amp([lean_db, -lean_db]) * treble_cut, size)[:, :N]


dry = scene()
out = record(dry)
persist_wave(out)
```